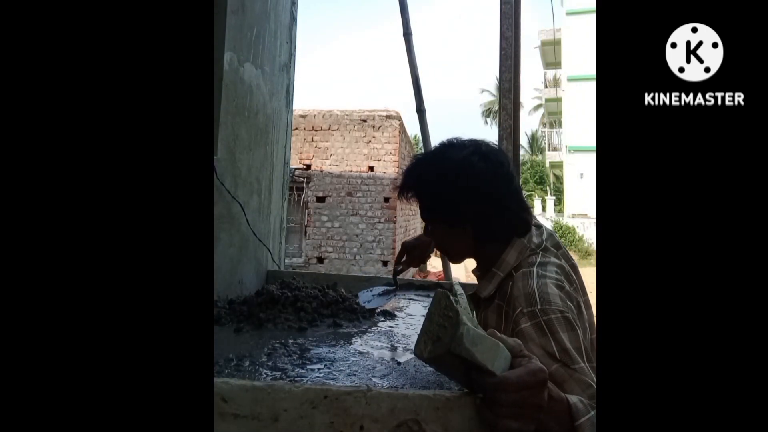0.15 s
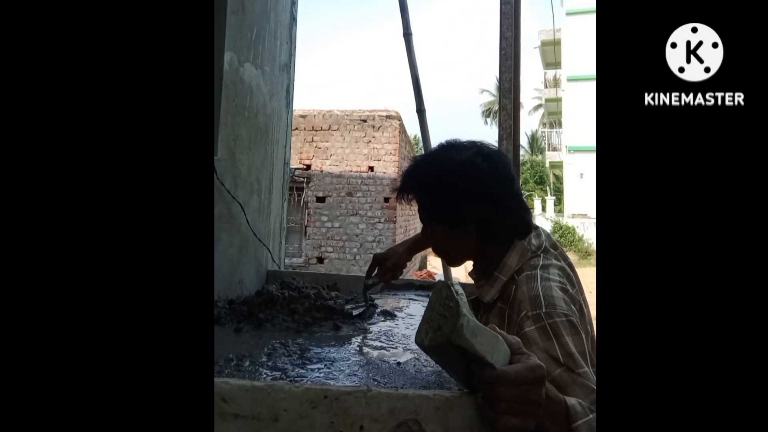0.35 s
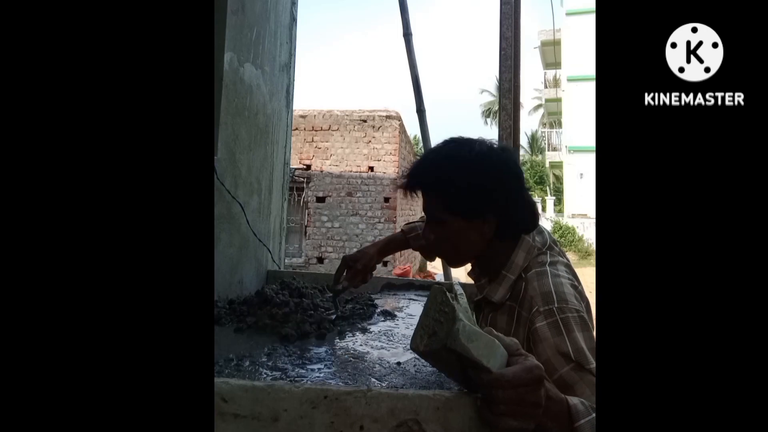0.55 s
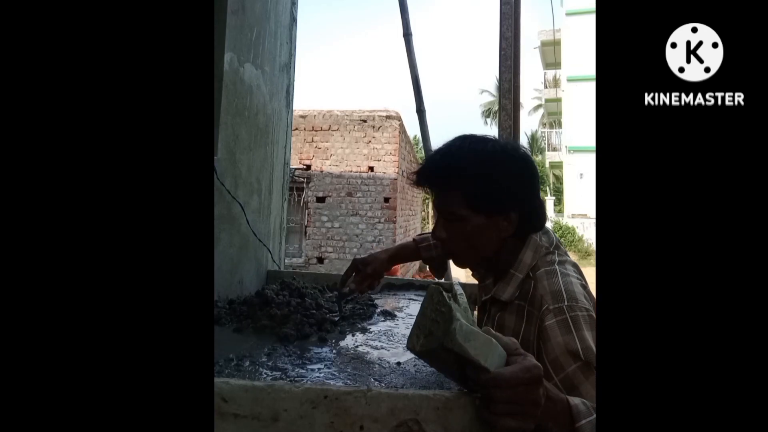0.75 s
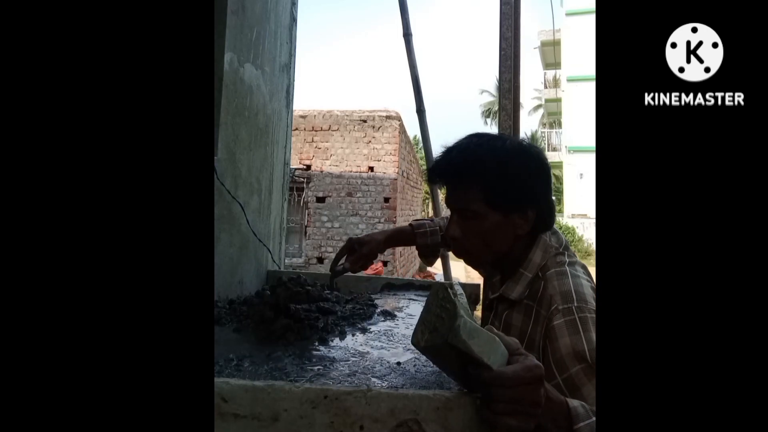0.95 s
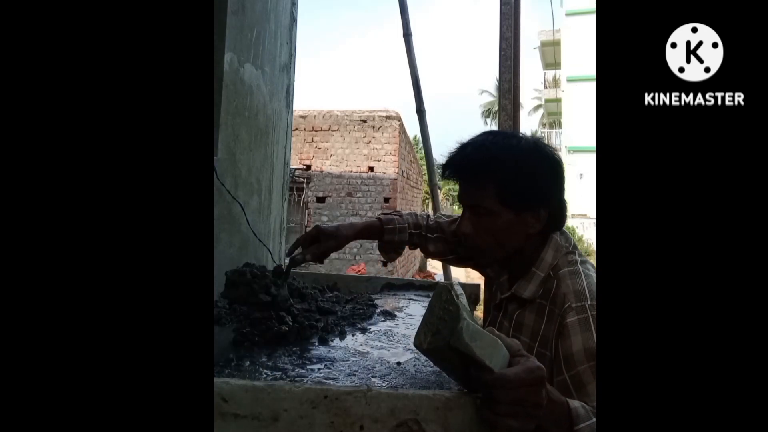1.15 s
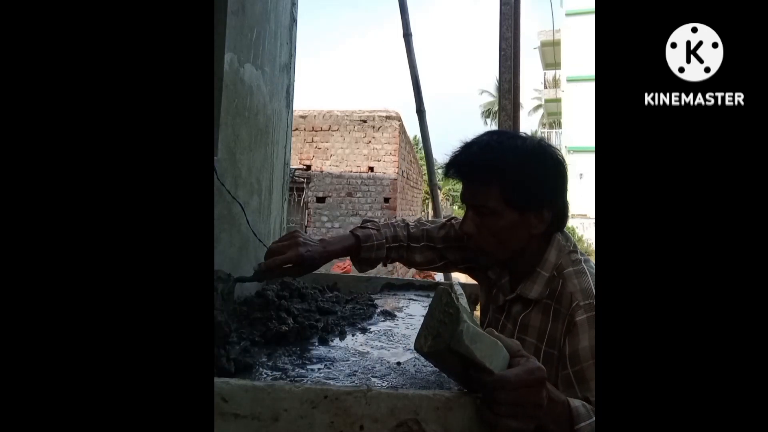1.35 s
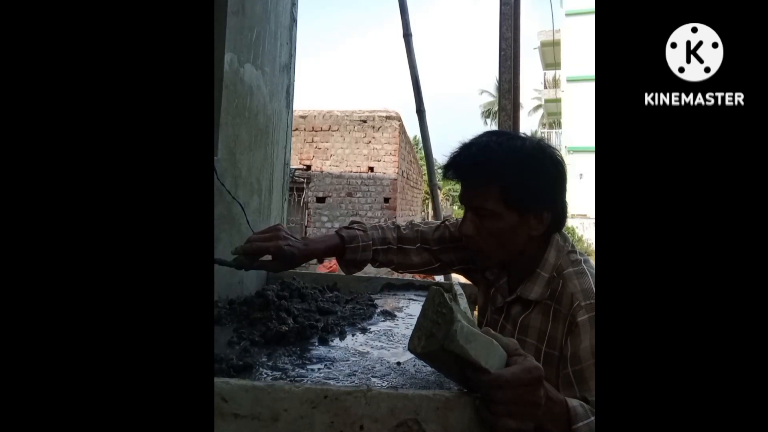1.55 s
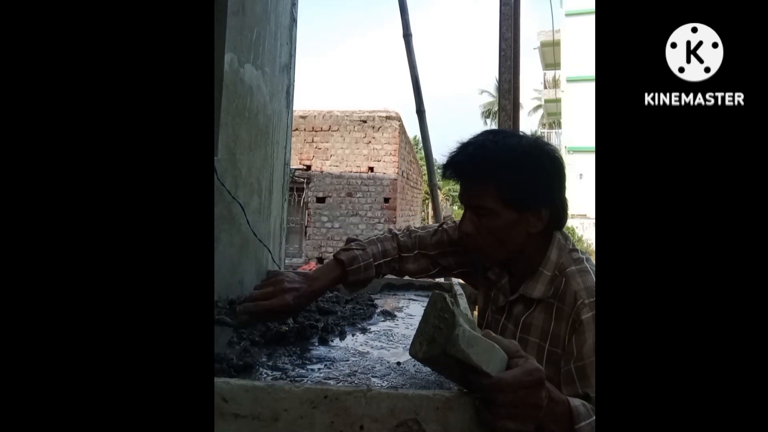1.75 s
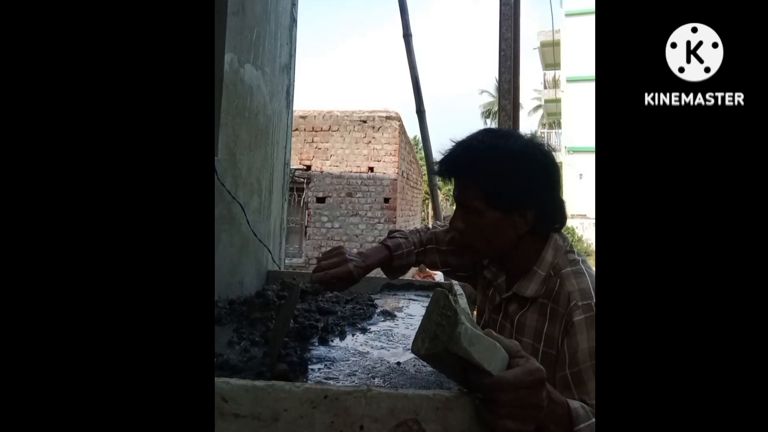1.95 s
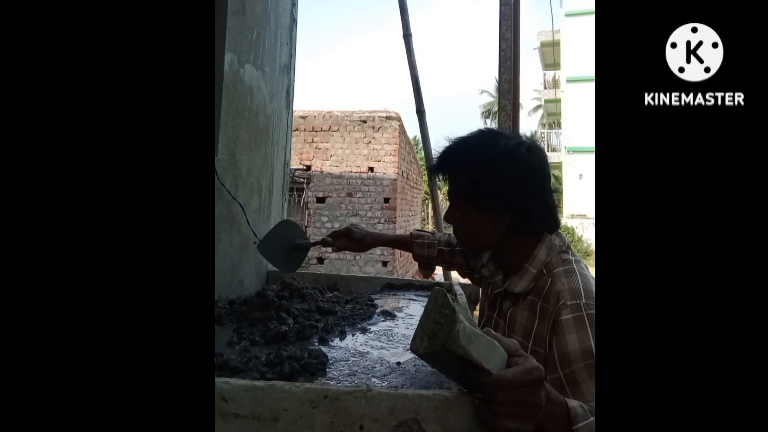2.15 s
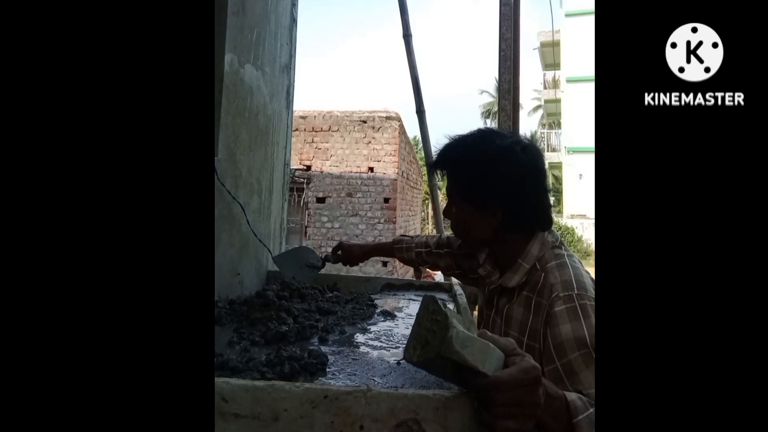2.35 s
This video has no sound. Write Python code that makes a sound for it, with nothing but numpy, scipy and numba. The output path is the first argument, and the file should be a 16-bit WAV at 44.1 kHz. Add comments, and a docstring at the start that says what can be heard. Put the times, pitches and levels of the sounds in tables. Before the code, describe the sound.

A steel trowel scrapes through wet concrete, loud, gritty and slightly hollow from 0.2 to 0.7 seconds, with tiny wet pops. It pushes softly until 1.4, then chops in with sharp stone ticks. A dull pat lands near 1.7. At 1.9 a knock starts another scrape, which fades by about 2.3 seconds. Nearby bare walls add a short ring over a faint hiss.

```python
"""Gritty scraping of a steel trowel in wet concrete, on a slab between bare walls at a building site.
It scoops a load, pushes it softly into the heap, chops in, pats it with a dull thud and scrapes back.
Sand grinds under the blade, the hollow between blade and slab rings at a gliding pitch,
stones tick against the steel, air pockets pop and the mortar gulps. The walls ring over a faint hiss."""
import sys
import numpy as np
from scipy import signal
from scipy.fft import rfft, irfft
from scipy.io import wavfile
from numba import njit

SR = 44100
rng = np.random.default_rng(int(sys.argv[2]) if len(sys.argv) > 2 else 0)


def store_pcm(level_fs):
    """Save levels as 16-bit WAV."""
    pcm = np.round(np.clip(level_fs, -1, 1) * 32767).astype(np.int16)
    wavfile.write(sys.argv[1], SR, np.atleast_2d(pcm).T)


N = 105840
TIME = np.arange(N) / SR

# blade strokes: time_s, sand_db, hollow_db, hollow_hz
APPROACH = [(0, -52, -57.5, 1230), (0.05, -58.5, -74, 1160), (0.108, -63, -57.5, 1190),
            (0.125, -47, -54, 1175), (0.19, -51.5, -56, 1200)]
SCOOP = [(0.216, -45.5, -63, 1180), (0.222, -34, -30, 1288), (0.256, -31, -32.5, 1266),
         (0.291, -32.5, -45.5, 1200), (0.313, -26, -28, 1292), (0.375, -30.5, -28.5, 1312),
         (0.414, -32.5, -27.5, 1222), (0.46, -28.5, -24, 1320), (0.48, -25.5, -26, 1157),
         (0.532, -24.5, -23.5, 1130), (0.561, -22, -27.5, 915), (0.611, -25.5, -26, 863),
         (0.67, -22.5, -25, 1247), (0.698, -32.5, -34.5, 1293), (0.735, -37.5, -32.5, 1350),
         (0.775, -52, -46, 1240)]
PUSH = [(0.8, -49.5, -50.5, 1130), (0.9, -48.5, -48.5, 993), (0.93, -39.5, -43.5, 808),
        (0.975, -44, -44.5, 704), (1.035, -43.5, -47.5, 997), (1.08, -48.5, -55, 1080),
        (1.138, -46, -55.5, 1160), (1.28, -51.5, -54.5, 1210), (1.295, -45.5, -49, 1130),
        (1.384, -57, -59.5, 1070), (1.439, -44.5, -49, 966)]
CHOP = [(1.447, -33, -35, 1170), (1.478, -36, -44, 1150), (1.521, -36.5, -46, 1200),
        (1.525, -28.5, -42.5, 1340), (1.538, -31.5, -28, 1403), (1.573, -29.5, -43, 1370),
        (1.599, -40, -49, 1195), (1.671, -44.5, -50.5, 1150), (1.711, -53, -53, 1080),
        (1.82, -75, -105, 1110), (1.857, -65.5, -63, 710)]
DRAW_BACK = [(1.889, -45, -83, 1090), (1.895, -22.5, -28.5, 1000), (1.909, -31, -45, 1210),
             (1.946, -29.5, -42.5, 1150), (1.978, -34.5, -40, 1010), (1.999, -30.5, -36, 1222),
             (2.06, -25.5, -34.5, 894), (2.086, -33, -38, 1035), (2.126, -28, -34, 1445),
             (2.146, -44, -53, 1300), (2.2, -45, -55.5, 1280), (2.27, -58, -63, 1060),
             (2.335, -71, -64, 1100), (2.4, -70, -66, 1130)]
GRAINS_PER_S, SAND_TRIM_DB = 5800, -3.5
JUDDER_DB, JUDDER_HZ = 1.6, 150
WANDER_SHARE, WANDER_HZ = 0.062, 14.6
def scraping():
    """The blade sticks and slips over sand; the hollow's pitch wavers as the mix shifts."""
    time_s, *columns = np.transpose([*APPROACH, *SCOOP, *PUSH, *CHOP, *DRAW_BACK])
    sand_db, hollow_db, hollow_hz = [np.interp(TIME, time_s, column) for column in columns]
    hollow_hz *= 1 + WANDER_SHARE * np.tanh(drift(WANDER_HZ))
    judder = from_db(JUDDER_DB * drift(JUDDER_HZ))
    grit = grains(GRAINS_PER_S) * judder
    grinding = from_db(sand_db + SAND_TRIM_DB) * sand(grit, judder)
    ringing = from_db(hollow_db) * hollow(grit, judder, hollow_hz)
    return grinding + ringing + edge_rasps(judder)


# sand grinding, with the phone microphone's dip near 4 kHz: freq_hz, gain_db
GRINDING_SPECTRUM = [(50, -35.5), (240, -17), (480, -16.5), (800, -2.5), (1400, -1.5), (2300, -1.5),
                     (3150, 2.5), (3700, -1), (4050, -6), (4700, -0.5), (5700, 1.5), (6700, -2.5)]
# blade resonance: pitch_hz, width_hz, level_db
BLADE_MODES = [(2135, 82, -22)]
GRAVEL_DB = -8
def sand(grit, judder):
    """Sand and gravel grind under the blade; the sand rings the steel."""
    hiss = colour(grit, GRINDING_SPECTRUM)
    hiss /= np.std(band(hiss, 2000, 7000))
    blade = sum(from_db(db) * narrow(grit, hz, width_hz) for hz, width_hz, db in BLADE_MODES)
    return hiss + blade + from_db(GRAVEL_DB) * gravel(judder)


def gravel(judder, ring_count=18, wander_db=4):
    """Coarse grains each excite one random treble ring; the rings come and go as the contact shifts."""
    clicks = grains(per_s=600, spread_db=3.5) * judder
    ring_of_click = rng.integers(0, ring_count, N)
    rings = np.zeros(N)
    for ring, hz in enumerate(np.geomspace(2400, 6900, ring_count)):
        contact = from_db(wander_db * np.tanh(drift(rate_hz=3.3)))
        rings += resonate(clicks * (ring_of_click == ring) * contact, np.full(N, hz), width_hz=170)
    return rms_one(colour(rings, GRINDING_SPECTRUM))


BODY_DB, CORE_DB, BODY_LOW_CUT_HZ = -3.5, -6, 620
def hollow(grit, judder, pitch_hz):
    """Grains ring the gap between blade and slab: a broad body with a clear core."""
    body = narrow(grains(per_s=3500) * judder, pitch_hz, width_hz=770)
    low_cut = signal.butter(4, BODY_LOW_CUT_HZ, "high", fs=SR, output="sos")
    body = rms_one(signal.sosfilt(low_cut, body))
    core = narrow(grit, pitch_hz, width_hz=110)
    return from_db(BODY_DB) * body + from_db(CORE_DB) * core


# edge rasps: centre_s, level_db, sigma_s
RASPS = [(0.125, -42, 0.012), (0.261, -29.5, 0.023), (0.321, -32.5, 0.015), (2.03, -31.5, 0.043)]
# steel edge: freq_hz, gain_db
RASP_SPECTRUM = [(2500, -25), (4400, -9.5), (5600, 4), (6800, -2.5), (9000, -1.5), (15000, 0)]
def edge_rasps(judder, gain=2):
    """The steel edge rasps brightly in short swells."""
    envelope = sum(swell(*row) for row in RASPS)
    bright_grit = rms_one(colour(grains(GRAINS_PER_S) * judder, RASP_SPECTRUM))
    return gain * envelope * bright_grit


# stone ticks: start_s, level_db, decay_s
TICKS = [(0.1205, -27, 0.0032), (0.4265, -5, 0.0019), (1.397, -22.5, 0.006), (1.4434, 1, 0.0022),
         (1.4505, 0, 0.0029), (1.508, -9, 0.0015), (1.5238, -1.5, 0.002), (1.5438, 0, 0.00047),
         (1.5615, 0.5, 0.0015), (1.8905, -19, 0.0012), (1.895, 1, 0.0036), (1.902, -0.5, 0.0067)]
# tick colour: freq_hz, gain_db
TICK_SPECTRUM = [(100, -27), (400, -19.5), (1200, -2), (2300, -5.5), (3200, 8), (4100, -4), (4800, 5),
                 (5700, 9), (6800, -16.5)]
# pats on the heap: start_s, level_db, decay_s
THUDS = [(1.4436, -16, .002), (1.6808, -1, .0014), (1.8955, -9, .005)]
# flat blade on wet concrete: freq_hz, gain_db
THUD_SPECTRUM = [(50, -34), (130, 0.5), (300, 8.5), (600, 12), (1030, 15), (1250, 0), (1550, 4.5),
                 (1900, -9), (6000, -26)]
def knocks():
    """Stones tick against the blade; the blade lands flat on the heap with a dull thud."""
    return colour(contacts(TICKS), TICK_SPECTRUM) + colour(contacts(THUDS), THUD_SPECTRUM)


# pebble clinks: start_s, level_db, pitch_hz
CLINKS = [(0.6117, -17.5, 5550), (0.9886, -33, 2660), (1.1388, -35, 3480), (1.276, -39, 5380)]
def clinks(t60_s=0.043):
    """Pebbles ring briefly, each at one pitch."""
    out = np.zeros(N)
    for start_s, db, hz in CLINKS:
        age = np.maximum(TIME - start_s, 0)
        out += from_db(db - 60 * np.minimum(age / t60_s, 2)) * np.sin(2 * np.pi * hz * age)
    return out


# air pockets: start_s, level_db, pitch_hz
POPS = [(0.2248, -24, 1100), (0.4105, -8.5, 1200), (0.4203, -8.5, 1290), (0.475, -26, 1170),
        (0.5035, -17, 1210), (0.533, -8.5, 1090), (0.606, -16.5, 914), (0.946, -22.5, 790),
        (1.539, -13.5, 1430), (1.6812, -25, 966), (1.699, -34, 800), (2.198, -32, 1270)]
def pops(t60_s=0.021, attack_s=0.0018, rise_share_per_s=1.6):
    """Air pockets burst under the blade and ring briefly, rising in pitch."""
    out = np.zeros(N)
    for start_s, db, hz in POPS:
        age = np.clip(TIME - start_s, 0, 2 * t60_s)
        envelope = (1 - np.exp(-age / attack_s)) * decay(age, t60_s)
        phase = 2 * np.pi * hz * age * (1 + rise_share_per_s * age / 2)
        out += from_db(db) * envelope * np.sin(phase)
    return out


# rumble of the mass: time_s, level_db
RUMBLE = [(1.42, -76), (1.47, -61), (1.54, -59.5), (1.69, -59), (1.74, -102)]
# mortar gulps: centre_s, level_db, sigma_s, pitch_hz
GULPS = [(0.102, -57, 0.031, 269), (0.365, -50.5, 0.013, 262), (0.716, -46.5, 0.015, 344),
         (1.484, -57, 0.029, 160), (1.963, -50, 0.051, 497), (2.146, -56, 0.059, 167)]
def mortar(gulp_width_share=0.71):
    """The wet mass shifts with a rumble and low gulps."""
    rumble_db = np.interp(TIME, *np.transpose(RUMBLE))
    out = from_db(rumble_db) * narrow(rng.standard_normal(N), hz=47, width_hz=52)
    for centre_s, db, sigma_s, hz in GULPS:
        out += swell(centre_s, db, sigma_s) * narrow(rng.standard_normal(N), hz, gulp_width_share * hz)
    return out


# standing waves: pitch_hz, level_db, t60_s
WALL_MODES = [(167.8, -59, 0.58), (236, -65, 0.45)]
# wall tail, with the phone microphone's dip near 4 kHz: freq_hz, gain_db
WALL_TAIL_SPECTRUM = [(230, 8), (500, 0), (800, 3.5), (1700, -7.5), (2400, -18), (3150, 4), (4050, -30),
                      (5100, 2.5), (6500, 4)]
EARLY_DB, EARLY_T60_S, EARLY_DELAY_S = -8.5, 0.076, 0.002
TAIL_DB, TAIL_T60_S, TAIL_ATTACK_S = -13, 0.39, 0.0044
def walls(x):
    """Slab and walls add close reflections, low standing waves and a tail."""
    t = TIME[:SR]
    early = rng.standard_normal(SR) * decay(t, EARLY_T60_S) * (t > EARLY_DELAY_S)
    response = from_db(EARLY_DB) * early / np.linalg.norm(early)
    response[0] = 1  # direct sound
    for hz, db, t60_s in WALL_MODES:
        response += from_db(db) * decay(t, t60_s) * np.cos(2 * np.pi * hz * t)
    tail = colour(rng.standard_normal(N), WALL_TAIL_SPECTRUM)[-SR:]
    tail *= decay(t, TAIL_T60_S) * (1 - np.exp(-t / TAIL_ATTACK_S))
    response += from_db(TAIL_DB) * tail / np.linalg.norm(tail)
    return signal.fftconvolve(x, response / np.linalg.norm(response))[:N]


# faint background hiss, with the phone microphone's dip near 4 kHz: freq_hz, gain_db
HISS_SPECTRUM = [(25, -21), (60, -28), (200, 0), (400, -10), (1100, -33), (2300, -42), (3200, -7.5),
                 (4100, -25), (5600, -4), (8000, -32)]
def background_hiss(level_db=-65.5):
    """Faint, steady noise."""
    return from_db(level_db) * rms_one(colour(rng.standard_normal(N), HISS_SPECTRUM))


def grains(per_s, spread_db=2):
    """Random clicks of uneven size."""
    sizes = from_db(spread_db * np.minimum(rng.exponential(1, N), 4))
    return sizes * rng.choice([-1, 1], N) * (rng.random(N) < per_s / SR)


def contacts(rows):
    """Each contact is a click and a dying crunch; shorter contacts are more click."""
    out = np.zeros(N)
    for start_s, db, decay_s in rows:
        start = int(start_s * SR)
        click = 1 / (1 + decay_s / 0.0065)
        envelope = np.exp(-np.minimum(TIME / decay_s, 20))
        burst = (rng.standard_normal(N) * envelope)[:N - start]
        burst *= np.sqrt(1 - click ** 2) / np.linalg.norm(burst)
        burst[0] += click
        out[start:] += from_db(db) * burst
    return out


def swell(centre_s, db, sigma_s):
    """Gaussian envelope."""
    return from_db(db) * np.exp(-.5 * ((TIME - centre_s) / sigma_s) ** 2)


def decay(age_s, t60_s):
    """Exponential fall, 60 dB in t60_s."""
    return np.exp(-np.log(1000) * age_s / t60_s)


def drift(rate_hz):
    """Low-passed noise at unit power."""
    pole = np.exp(-2 * np.pi * rate_hz / SR)
    return rms_one(signal.lfilter([1], [1, -2 * pole, pole * pole], rng.standard_normal(N + SR))[SR:])


@njit
def resonate(x, hz, width_hz):
    """Resonator with a moving centre and unit peak gain."""
    out, state = np.zeros(len(x)), 0j
    radius = np.exp(-np.pi * width_hz / SR)
    for i in range(len(x)):
        state = state * radius * np.exp(2j * np.pi * hz[i] / SR) + x[i]
        out[i] = 2 * (1 - radius) * state.real
    return out


def narrow(x, hz, width_hz):
    """Two resonators in series, output at unit power."""
    centre = hz * np.ones(N)
    return rms_one(resonate(resonate(x, centre, width_hz), centre, width_hz))


def colour(x, points, size=4096):
    """Minimum-phase filter through freq_hz, gain_db points."""
    hz, db = np.transpose(points)
    grid_hz = np.maximum(np.arange(size // 2 + 1) * SR / size, 1)
    gain = from_db(np.interp(np.log(grid_hz), np.log(hz), db))
    cepstrum = irfft(np.log(gain))
    cepstrum[1:size // 2] *= 2
    cepstrum[size // 2 + 1:] = 0
    return signal.fftconvolve(x, irfft(np.exp(rfft(cepstrum))))[:N]


def band(x, low_hz, high_hz):
    """Band-pass."""
    return signal.sosfilt(signal.butter(2, [low_hz, high_hz], "band", fs=SR, output="sos"), x)


def from_db(db):
    """Decibels to gain."""
    return 10 ** (np.asarray(db) / 20)


def rms_one(x):
    """Scale to unit power."""
    return x / np.sqrt(np.mean(x ** 2) + 1e-20)


def scene():
    """Trowel work between the walls, over a faint hiss."""
    hiss = background_hiss()
    trowel = scraping() + knocks() + clinks() + pops() + mortar()
    return (walls(trowel) + hiss)[None]


# microphone response: freq_hz, gain_db
MICROPHONE = [(20, -25), (60, 0), (6700, 2), (7200, -7), (7900, -20), (13400, -29), (14300, -11),
              (14900, -20), (15400, -6), (15800, 10)]
SOFT_LIMIT, STOPBAND_HZ = 0.98, 16200
def record(dry):
    """A small microphone rounds the peaks; it is dull above 7 kHz, with a narrow peak at the very top."""
    rounded = SOFT_LIMIT * np.tanh(dry[0] / SOFT_LIMIT)
    low_pass = signal.cheby2(14, 60, STOPBAND_HZ, fs=SR, output="sos")
    return signal.sosfilt(low_pass, colour(rounded, MICROPHONE))[None]


dry = scene()
out = record(dry)
store_pcm(out)
```